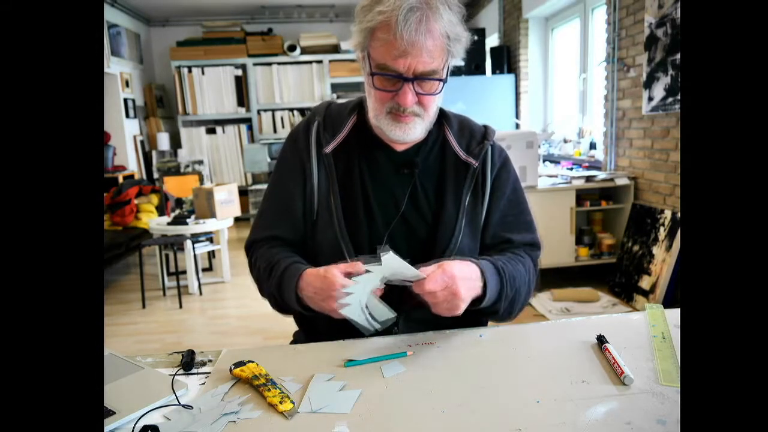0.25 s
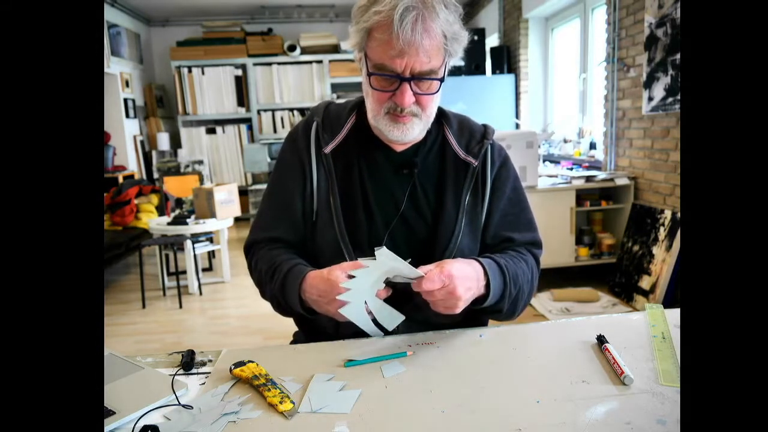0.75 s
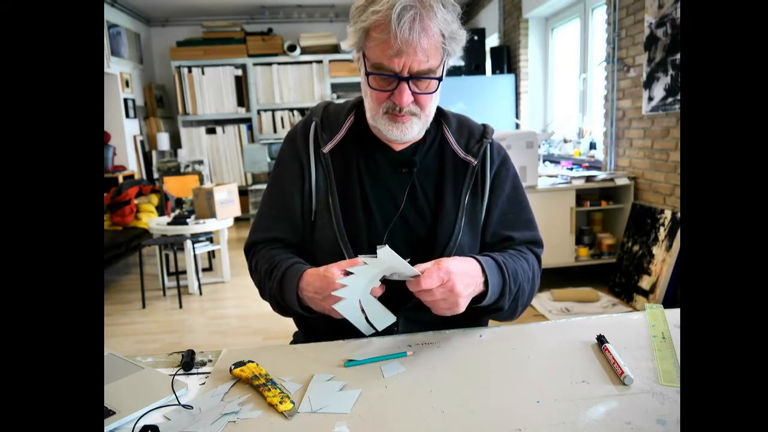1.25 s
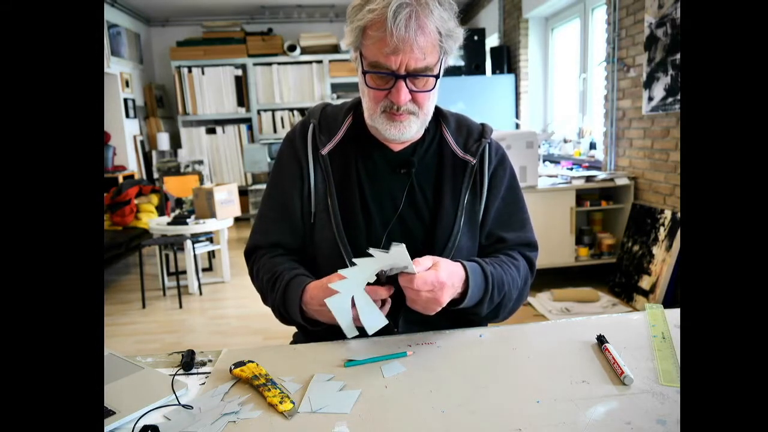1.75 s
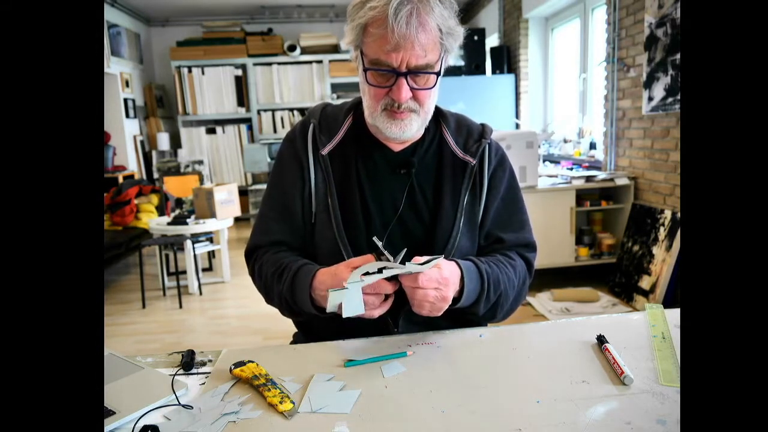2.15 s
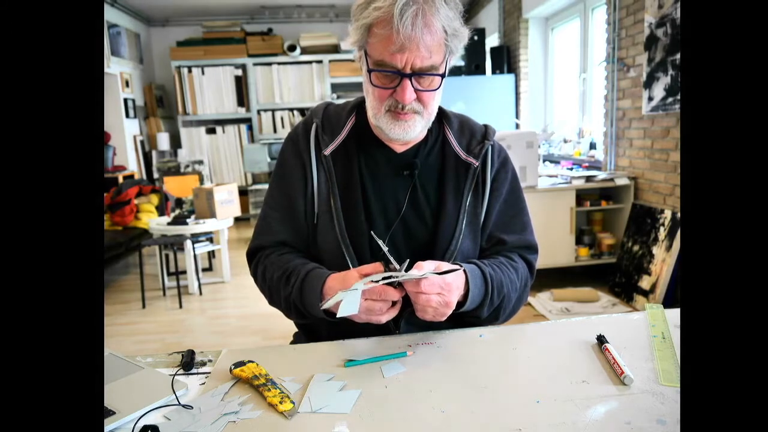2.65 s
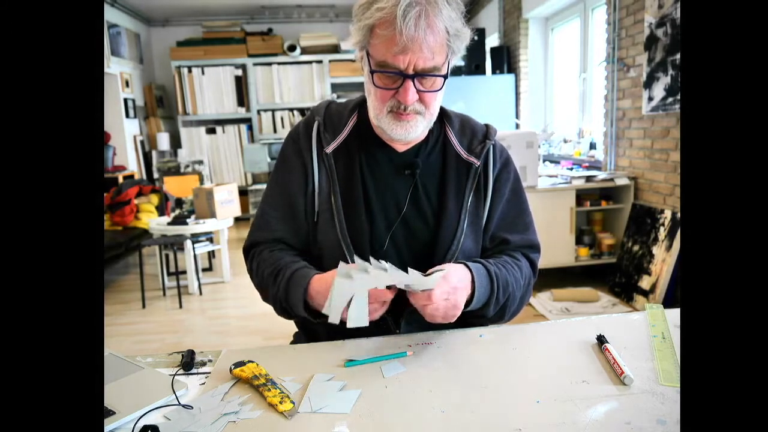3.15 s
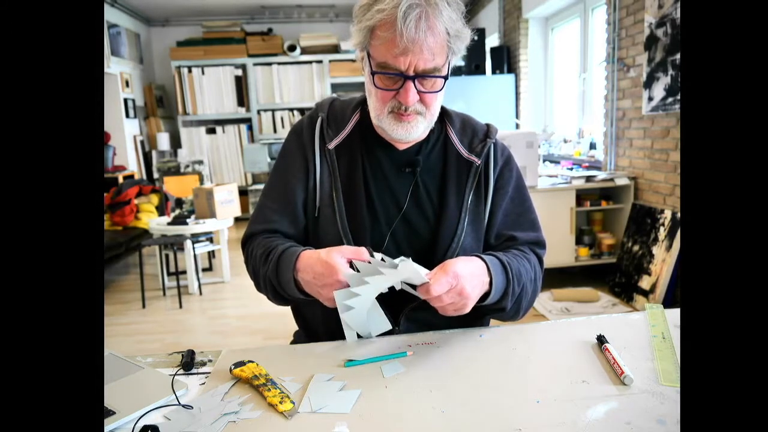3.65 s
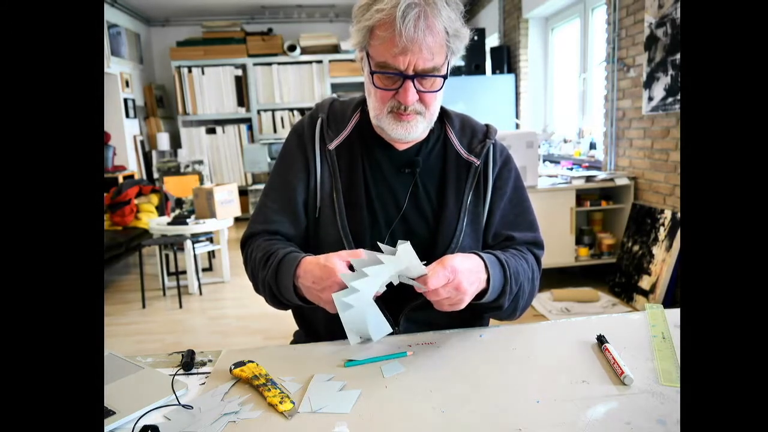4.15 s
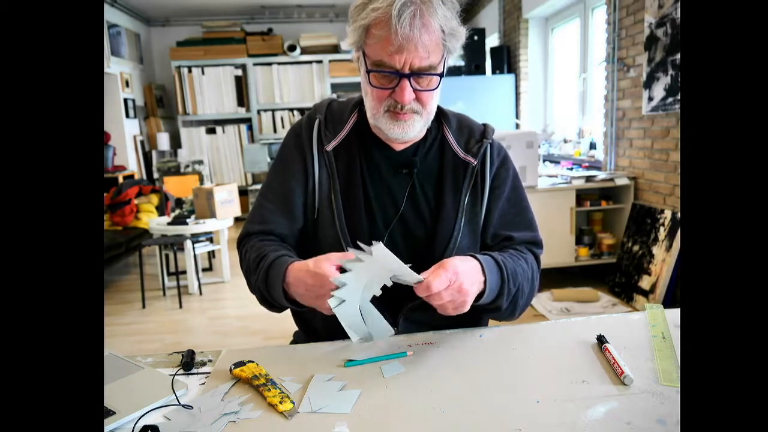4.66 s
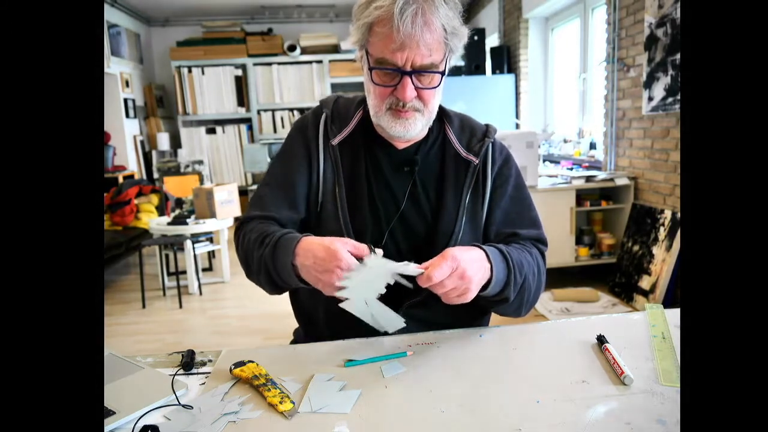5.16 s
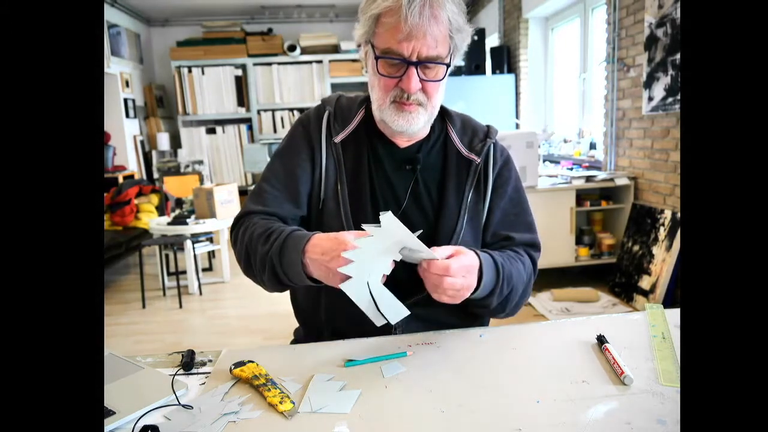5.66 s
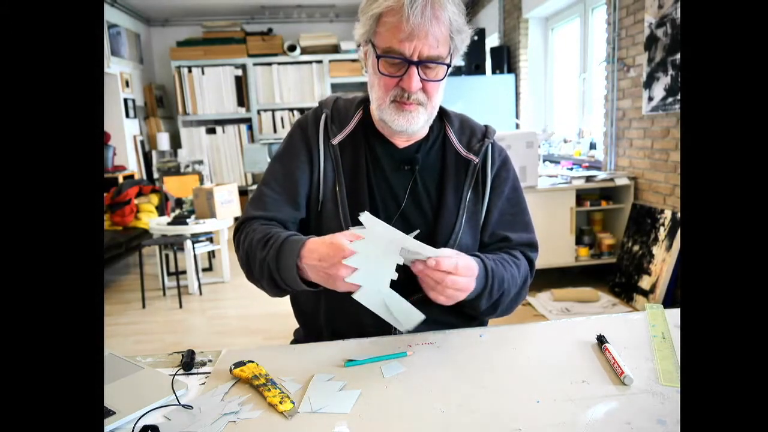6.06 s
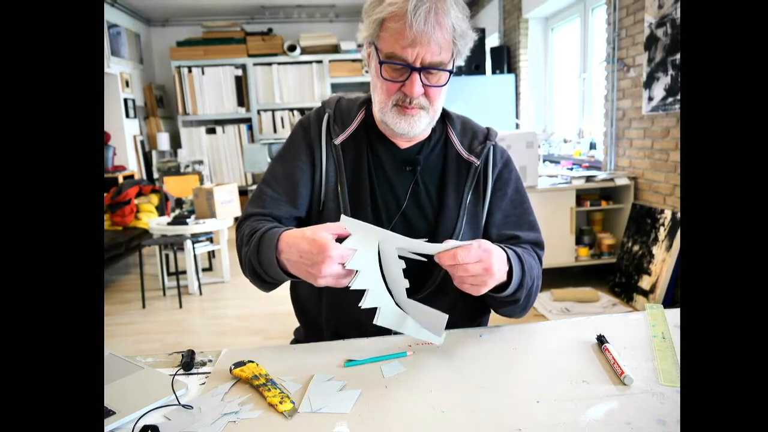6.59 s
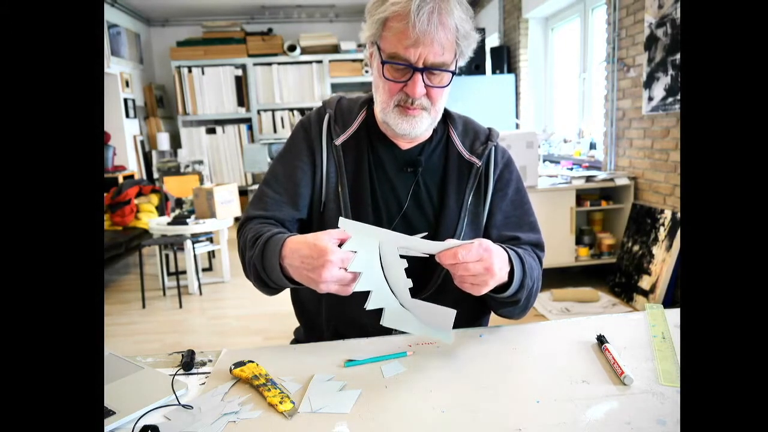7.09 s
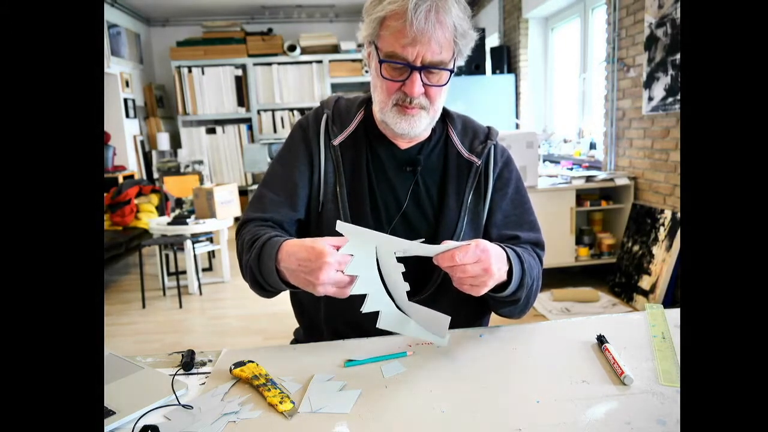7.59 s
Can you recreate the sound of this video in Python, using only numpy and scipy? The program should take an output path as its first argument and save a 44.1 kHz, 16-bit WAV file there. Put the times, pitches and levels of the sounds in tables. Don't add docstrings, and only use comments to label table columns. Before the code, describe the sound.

A close, dry view of scissors and stiff folded card in a quiet furnished room with faint hush. At 0.2 s a small cluster of papery pops, then a scraping bite at 0.6 and near quiet with tiny ticks. From 1.3 to 1.6 light snaps and a rub lead to a soft low slap; around 1.9-2.1 pressing, tearing crackles. Crunches run from 2.4 to 2.9, then a rising rub. At 3.2 the loudest moment: two or three hard, bright cracks with a heavy flap of the sheet. Rustles and a crunch follow at 3.4-3.7, dense small snaps at 4.0-4.4 with a sharper crack at 4.26, and a slap and crackle at 4.7-4.9. Rubs thin out after 5; a boxy pop comes at 5.55 and a firm snap at 5.96. Sparse scrapes and ticks continue, a barely audible steel touch at 7.0, then crisp snaps and a pressing scrape from 7.25 to 7.8.

```python
import sys
import numpy as np
from scipy import signal
from scipy.io import wavfile
from scipy.ndimage import uniform_filter1d

SR = 44100
rng = np.random.default_rng(int(sys.argv[2]) if len(sys.argv) > 2 else 0)


def master(y):
    cut = np.clip(np.atleast_2d(y).T, -1, 1)
    pcm = np.round(cut * 32767)
    wavfile.write(sys.argv[1], SR, pcm.astype(np.int16))


def decibels_to_gain(level_db):
    exponent = np.asarray(level_db, float) / 20
    return 10 ** exponent


N = 345303


def evened(x):
    return x / np.sqrt(np.mean(x ** 2) + 1e-20)


def topped(x):
    return x / np.sqrt(uniform_filter1d(x ** 2, size=44).max() + 1e-20)


def read(points, hz):
    f, value = np.transpose(points)
    return np.interp(np.log(hz + 1), np.log(f + 1), value)


def add(mix, s, sound):
    part = mix[round(s * SR):][:len(sound)]
    part += sound[:len(part)]


def colour(x, points):
    size = 2048
    gain_db = np.maximum(read(points, abs(np.fft.fftfreq(size, 1 / SR))), -70)
    log_gain = np.log(decibels_to_gain(gain_db))
    taps = np.fft.ifft(np.exp(np.conj(signal.hilbert(log_gain)))).real[:size // 2]
    return signal.oaconvolve(x, taps)[:len(x)]


def dulled(x, hz):
    return signal.sosfilt(signal.butter(3, min(hz, SR / 3), fs=SR, output="sos"), x)


def thinned(x):
    return signal.sosfilt(signal.butter(2, 130, "highpass", fs=SR, output="sos"), x)


def drift(per_s):
    return evened(signal.lfilter([1], [1, -np.exp(-2 * np.pi * per_s / SR)], rng.standard_normal(N)))


# frequency in Hz, density in dB per Hz.
HUSH = [(12, -41), (20, -35.5), (77, 5), (229, 6), (536, -2), (632, 5.5), (745, -7), (928, 6.5),
        (1360, -13.5), (2170, -5), (2860, -12.5), (4430, -13.5), (9000, -15.5), (12500, -30),
        (14500, -39.5), (16000, -69.5)]


def hush():
    level_db = -76 + 1.2 * drift(0.14)
    return decibels_to_gain(level_db) * evened(colour(rng.standard_normal(N), HUSH))


# frequency in Hz, t60 in seconds.
ROOM = [(200, 0.054), (1000, 0.28), (4000, 0.17), (12000, 0.028)]


def room(x):
    taps = np.zeros(SR // 2)
    at = np.arange(300, len(taps) - 20, 20)
    taps[at + rng.integers(0, 20, len(at))] = rng.choice([-1., 1.], len(at))
    hz, t, z = signal.stft(taps, SR, nperseg=256)
    t60 = np.maximum(read(ROOM, hz), .02)[:, None]
    tail = signal.istft(z * decibels_to_gain(-60 * t / t60), SR, nperseg=256)[1]
    return signal.oaconvolve(x, tail / np.linalg.norm(tail))[:N]


# start in seconds, peak in dB, frequency in Hz.
SLAPS = [(0.167, -56, 75), (0.162, -50, 229), (1.618, -36, 185), (1.923, -49.5, 128), (3.229, -26.5, 207.7),
         (3.692, -35, 221), (4.255, -52, 196), (4.739, -32, 221.7), (5.553, -40, 251), (5.334, -46.5, 151),
         (5.904, -55, 149), (7.328, -47, 259), (7.72, -70, 200), (7.771, -46, 180)]


def slaps():
    out, t = np.zeros(N), np.arange(5000) / SR
    for s, db, hz in SLAPS:
        push = np.sin(2 * np.pi * hz * t) * np.exp(-t * hz)
        add(out, s, decibels_to_gain(db) * push * np.minimum(t / 0.0039, 1))
    return out


# start in seconds, level in dB, frequency in Hz, t60 in seconds.
BLADE = [
    (7.027, -82.5, 8000, 0.37),
    (7.104, -84, 8070, .3),
]


def blades():
    out, t = np.zeros(N), np.arange(SR // 4) / SR
    for s, db, hz, t60 in BLADE:
        add(out, s, decibels_to_gain(db - 60 * t / t60) * np.sin(2 * np.pi * hz * t))
    return out


# start in seconds, length in seconds, level in dB, frequency in Hz, glide in Hz.
RASPS = [(1.005, .012, -64, 7300, 0), (1.47, .06, -60, 1900, 0), (1.7, .09, -54, 1800, 0),
         (1.9, .07, -51, 1700, 0), (1.95, .05, -51, 4000, 0), (2.29, .045, -65, 4400, 0),
         (2.39, .08, -51, 1000, 0), (3.155, .012, -48, 4500, 200), (3.205, .045, -37, 1900, 0),
         (3.23, .03, -36, 420, 0), (3.857, .012, -56, 4700, 0), (3.857, .012, -60, 1800, 0),
         (3.892, .008, -52, 4500, 0), (4.005, .04, -64, 4700, 0), (4.17, .11, -54, 420, 0),
         (4.465, .01, -70, 7000, 0), (4.62, .045, -61, 3700, 0), (4.64, .05, -56, 1400, 0),
         (4.7, .045, -52, 4600, 400), (4.92, .08, -53, 4600, 300), (4.93, .07, -61, 7850, 0),
         (5.12, .05, -74, 8100, 200), (5.215, .115, -57, 4810, -150), (5.23, .1, -67, 7900, -200),
         (5.24, .09, -64, 3900, 0), (5.553, .01, -40, 380, 0), (5.57, .04, -57, 4300, 0),
         (5.94, .02, -58, 4200, 0), (5.94, .02, -56, 1100, 0), (5.961, .003, -37, 2570, 0),
         (5.97, .1, -52, 450, 0), (6.12, .07, -61, 2000, 100), (7.026, .004, -57, 4900, 0),
         (7.026, .004, -55, 7300, 0), (7.125, .03, -57, 1500, 0), (7.15, .05, -77, 7600, -100)]
DRAGS = [(.16, 0.0065, -58, 14300, 0), (.612, 0.045, -66, 14500, -500), (1.618, 0.0069, -36.5, 2150, -3),
         (4.695, .06, -62, 14800, 0), (5.552, 0.0086, -41, 1106, 0), (7.102, .01, -63, 13800, 0),
         (6.8, 0.037, -61, 2300, 4.5), (.159, 0.0084, -35, 1622, 0), (1.47, .06, -76, 7300, 0),
         (2.38, .09, -69, 7000, 0), (2.383, .085, -52, 4400, -9), (2.545, .02, -63.5, 14000, 0),
         (3.2273, .003, -18, 2200, -0.5), (3.425, .06, -65, 7800, 500), (3.429, .03, -49, 4300, 0),
         (3.55, .08, -56, 7200, 395), (3.56, .11, -54, 11300, 298), (4.275, .04, -57, 4400, -300),
         (4.336, .08, -56.5, 3800, -11), (4.334, .08, -63.5, 7200, -6), (4.335, .09, -64.5, 14300, 0),
         (4.409, .03, -55.5, 2600, 0), (4.463, .07, -61, 3800, -6), (4.7, .045, -43.5, 4800, 311),
         (4.702, .04, -49, 8300, -1.5), (4.918, .085, -59, 4500, 492), (5.565, .045, -65, 14300, 0),
         (5.989, .04, -56, 7300, 0), (6.27, .07, -74, 14300, 2), (7.026, .004, -58, 2100, -2),
         (7.025, .004, -53, 9800, 0), (7.72, .07, -66, 14300, 0)]
RASP_WIDTH_HZ, DRAG_WIDTH_HZ = 320, 1300
RASP_EDGE_S, CHATTER_DB = 0.0055, 3


def rasps():
    out, t = np.zeros(N), np.arange(SR // 4) / SR
    rows = [(*row, RASP_WIDTH_HZ) for row in RASPS] + [(*row, DRAG_WIDTH_HZ) for row in DRAGS]
    chance = rng.standard_normal((len(rows), 3, len(t)))
    for (s, length, db, hz, glide_hz, width_hz), (a, b, c) in zip(rows, chance):
        r = np.exp(-np.pi * width_hz / SR)
        chatter = decibels_to_gain(CHATTER_DB * evened(uniform_filter1d(c, size=90)))
        band = signal.lfilter([1], [1, -2 * r, r * r], (a + 1j * b) * chatter)
        pitch_hz = hz + glide_hz * np.minimum(t / length, 1)
        turn = np.exp(2j * np.pi * np.cumsum(pitch_hz) / SR)
        edge = min(RASP_EDGE_S, length / 2)
        shape = np.minimum(t / edge, 1) * np.exp(-np.maximum(t - length, 0) / edge)
        add(out, s - edge / 2, decibels_to_gain(db) * shape * evened((band * turn).real))
    return out


def fibre_burst(noise, length, t):
    u = t / np.clip(length - .0012, .0006, .03)
    rise = np.minimum(t / (0.0021 + 75 * length ** 2), 1)
    decay = np.exp(-1.2 * u - 1.9 * u ** 2) + 0.082 * np.exp(-.5 * u)
    burst = noise * rise * decay
    facing = int(10 + 3 * abs(noise[-1]) + 6 * abs(noise[-2]))
    return burst - 1.8 * np.roll(burst, facing)


# frequency in Hz, density in dB per Hz.
BOOM = [(250, -34.5), (430, 4.5), (800, 6.5), (1300, 3), (1700, 1), (2100, 0.5), (2600, -6.5), (3300, -8.5),
        (5000, -34.5), (11500, -42.5), (14500, -66)]
SCRAPE = [(1530, -5.5), (2600, -4.5), (2970, -2), (4010, 3), (4350, 0), (4720, 2), (5310, -4.5),
          (5940, -13.5), (6580, -8), (7210, -7), (8800, -20), (11400, -64), (19400, -120)]
FIZZ = [(3000, -41.5), (6000, -21.5), (8400, -8), (9000, -7), (10400, 1), (11300, -4.5), (12400, -14),
        (13200, -22), (15500, -59.5)]
AIR = [(11000, -31), (12500, -5.5), (13800, 3), (14600, -4.5), (15400, -21), (16300, -41.5)]


def panel_ring(burst, hz, t):
    modes = np.cos(2 * np.pi * hz * t) + 0.22 * np.cos(2 * np.pi * 2.103 * hz * t)
    ring = np.exp(-t * (hz / 6.2 + 200)) * modes
    panel = topped(dulled(signal.fftconvolve(burst, ring)[:len(t)], 2.13 * hz))
    return topped(panel + 0.35 * topped(dulled(colour(burst, BOOM), 2.18 * hz)))


# start in seconds, crack level in dB, panel pitch in Hz,
# panel level in dB above the crack, fizz level in dB above the crack.
BREAKS = [(0.1999, -53.5, 840, 19.5, -8), (0.3107, -84, 866, 38, -12), (0.6281, -46, 725, 18, 11),
          (1.321, -56, 766, -5, 8.5), (1.348, -53.5, 1420, 4.5, -2), (1.3904, -72.5, 593, 26, 1),
          (1.572, -62, 1370, 21.5, -2), (1.585, -41.5, 860, -1, -10), (1.5958, -53.5, 1040, 16, 3),
          (2.0724, -49.5, 895, 3.5, -20), (2.4358, -54.5, 1020, 16.5, -7),
          (3.1848, -14.5, 1620, -37, -17.5), (3.207, -36.5, 1700, 11.5, -15),
          (3.2271, -13.5, 1370, -1.5, -18), (4.2161, -42, 727, 14, -1), (4.2565, -27, 980, -4.5, -9.5),
          (5.3572, -48.5, 914, 10.5, -33), (5.905, -46.5, 360, 7, -31.5), (5.961, -30, 1150, 12.5, -40),
          (6.264, -54.5, 1200, 16, -8), (7.0262, -64, 2030, 21, 1), (7.5063, -70, 606, -6.5, 11),
          (7.6728, -44, 1104, 11.5, 12.5)]
SNAPS_OF_FOLD = [(0.1865, -55.5, 890, 20, -10), (0.2085, -46, 920, 13, -10), (0.2148, -43.5, 880, 10, -12),
                 (1.3742, -73.5, 410, 19, 25), (1.6172, -35.5, 970, 4, -1.5),
                 (3.0587, -52, 785, 14.5, -16.5), (3.0696, -53, 805, 12, -5), (3.156, -36.5, 1380, -1, -14),
                 (3.193, -35.5, 616, 8, -19), (3.212, -35, 1150, 7.5, -17), (3.4525, -60, 605, 2, -14),
                 (3.892, -57, 730, 1, -26), (4.1723, -39.5, 744, 9.5, -24.5), (4.2291, -39.5, 740, 1, -5),
                 (4.2669, -37.5, 696, 5.5, -10), (4.483, -46.5, 473, -3, -11), (4.74, -35.5, 695, 6.5, 4),
                 (4.7659, -36, 1790, 7, -11), (4.8327, -42.5, 900, 10.5, -14),
                 (4.8884, -56.5, 696, 14.5, 20), (5.5518, -52, 605, 27, -16.5),
                 (5.8776, -47.5, 362, -31.5, -12.5), (7.2542, -44, 1840, -0.5, 0.5),
                 (7.6197, -39, 1320, -5, 5)]
TEARS = [(0.1585, -32.5, 965, 8.5, -6), (0.323, -81.5, 975, 28, -12), (1.0932, -47, 840, 12, -9),
         (1.9243, -46.5, 335, 3, -22), (1.9623, -36.5, 1360, -8, -23), (2.0072, -68.5, 925, 27.5, -3),
         (2.0466, -44, 2070, 5, -1), (2.5046, -54.5, 1000, -2, 1), (2.5956, -46, 930, 5, -12),
         (2.62, -40, 940, -6, -4), (2.6569, -41.5, 980, 2.5, -5), (3.2369, -42, 1190, 20.5, -16),
         (3.4663, -64, 860, 13, -10), (3.6905, -34.5, 910, 4, -19), (4.0756, -40.5, 1350, 3.5, -9),
         (4.1471, -42, 855, 6, -25), (4.3627, -43.5, 1230, -5, -17), (5.3308, -60, 1380, 22, -42),
         (6.4837, -58.5, 2063, 13, 0), (7.1022, -41, 1560, 0, 0.5), (7.3282, -43.5, 520, 3, 0.5),
         (7.3733, -57.5, 560, -15, 6), (7.587, -46, 1860, 4.5, -22), (7.719, -50, 540, 8, 4),
         (4.1375, -44.5, 1270, 6, -5)]
CRUNCHES = [(1.9405, -47, 1510, 7.5, -15), (1.9891, -34.5, 1460, -3.5, -15), (2.4485, -51, 1000, 14, -4),
            (2.5381, -35.5, 744, -1, -1.5), (2.5695, -39, 716, 3, -2.5), (2.8485, -39.5, 540, -0.5, -12),
            (3.6392, -38.5, 1470, 4.5, -30), (4.0462, -43, 1330, 3, -6), (4.1008, -39.5, 1150, 3.5, -8),
            (4.123, -52.5, 900, 9, -5), (5.6894, -55.5, 950, 13.5, 5), (6.2488, -65.5, 1820, 22, -22),
            (6.791, -55, 1810, 7, -3), (4.18, -50.5, 780, 3, -27), (3.66, -55.5, 530, 18, -11),
            (3.25, -53.5, 400, 8, -11.5)]
# start in seconds, crack level in dB, fizz level in dB above it.
TICKS = [(1.0051, -62.5, -5), (1.2, -57, 5.5), (2.215, -64, -31), (2.299, -56.5, -3), (2.8191, -48.5, 2),
         (3.83, -51, -45), (3.859, -55, 0), (3.912, -66, -11), (2.689, -58, 5), (4.548, -57.5, 2),
         (4.6, -61, 2), (4.844, -57, 7), (4.875, -71, -2), (4.009, -53.5, 4.5), (5.84, -56, -1),
         (7.158, -67, 7), (7.273, -45.5, -6), (7.422, -62.5, -4), (0.315, -69.5, -3), (.332, -75, -2),
         (1.154, -60, -10), (1.298, -65, -4), (2.317, -57, 2.5), (3.419, -54.5, 4), (3.668, -47, -4),
         (4.756, -46, 4), (4.882, -63, -12), (5.813, -66.5, -2), (6.455, -64, -3), (7.203, -77, -9),
         (.822, -71, 6.5), (.913, -72, 0), (6.581, -68, -10.5), (6.65, -67, -5), (6.703, -75, -2),
         (6.757, -65, -7)]
BREAK_S, SNAP_S, TEAR_S, CRUNCH_S, TICK_S = 0.0022, 0.0045, 0.0064, 0.0087, 0.0065
TICK_HZ, TICK_PANEL_DB = 970, -10.5


def snaps():
    out, t = np.zeros(N), np.arange(2600) / SR
    kinds = zip((BREAKS, SNAPS_OF_FOLD, TEARS, CRUNCHES), (BREAK_S, SNAP_S, TEAR_S, CRUNCH_S))
    rows = [(*row, length) for table, length in kinds for row in table]
    rows += [(s, db, TICK_HZ, TICK_PANEL_DB, fizz_db, TICK_S) for s, db, fizz_db in TICKS]
    chance = rng.standard_normal((len(rows), len(t)))
    for (s, db, hz, panel_db, fizz_db, length), noise in zip(rows, chance):
        burst = fibre_burst(noise, length, t)
        crack = topped(colour(burst, SCRAPE))
        fizz = decibels_to_gain(fizz_db) * topped(colour(burst, FIZZ))
        air = decibels_to_gain(-22) * topped(colour(burst, AIR))
        panel = decibels_to_gain(panel_db) * panel_ring(burst, hz, t)
        add(out, s + .0004, decibels_to_gain(db) * (crack + fizz + air + panel))
    return out


def strokes(rows, attack, change_db, release):
    power, t = np.zeros((3, N)), np.arange(SR // 2) / SR
    onset = np.minimum(t / attack, 1) ** 2
    for s, length, db, boom_db, fizz_db in rows:
        slope_db = change_db * np.minimum(t / length, 1) - max(change_db, 0)
        shape_db = slope_db - release * np.maximum(t - length, 0)
        shape = (onset * decibels_to_gain(db + shape_db)) ** 2
        for layer, above_db in zip(power, (0, boom_db, fizz_db)):
            add(layer, s - attack / 2, shape * decibels_to_gain(2 * above_db))
    return power


def patchy(x, patch_db, shift_db):
    z = signal.stft(x, nperseg=256)[2]
    fine, wide = rng.standard_normal((2, z.shape[1], z.shape[0]))
    fine = evened(uniform_filter1d(uniform_filter1d(fine, size=40, axis=0), size=2, axis=1))
    wide = evened(uniform_filter1d(uniform_filter1d(wide, size=14, axis=0), size=7, axis=1))
    gain_db = np.clip(patch_db * fine + shift_db * wide, -10, 7)
    return signal.istft(z * decibels_to_gain(gain_db).T, nperseg=256)[1][:N]


def slips():
    size = decibels_to_gain(2.8 * np.minimum(rng.exponential(1, N), 3))
    grains = size * (rng.random(N) < 3000 / SR)
    drive = 1.2 * rng.standard_normal(N) + evened(grains * rng.standard_normal(N))
    clumping = decibels_to_gain(1.5 * np.clip(drift(22), -2, 2))
    return patchy(drive * clumping, patch_db=3.5, shift_db=2.3)


# frequency in Hz, density in dB per Hz.
HOLLOW = [(60, -29.5), (150, -8.5), (300, -1.5), (360, 4), (480, -16.5), (800, -41.5), (11500, -35),
          (14500, -69)]
# start in seconds, length in seconds,
# scrape level in dB, panel boom in dB above it, fibre fizz in dB above it.
BITES = [(.604, 0.11, -42, 6.5, -0.5), (1.318, 0.11, -64, 7.5, 0), (1.615, 0.18, -51, 10.5, 3.5),
         (2.045, 0.037, -44, 4, -12), (2.54, 0.17, -68, 8, 10), (2.54, 0.79, -74, 19.5, -8),
         (2.85, 0.031, -59, 24.5, 15.5), (3.187, 0.18, -36, 9.5, -9), (4.69, 0.05, -54, 10, 7),
         (4.747, 0.3, -58, 18.5, -24), (5.56, 0.075, -49.5, -18, 2.5), (5.965, 0.25, -47.5, 6, 1.5),
         (6.79, 0.058, -54.5, -19, -1), (7.03, 0.043, -82, 20, 3.5), (7.103, 0.06, -55.5, 10, 0),
         (7.255, 0.055, -56, 9.5, -2), (7.33, 0.058, -70, 16, 6)]
RUBS = [(.165, 0.075, -61, 15.5, -3), (.8, 0.07, -78, 13, -10), (1.47, 0.069, -49.5, -34, -3.5),
        (1.56, 0.1, -59.5, 5, -0.5), (1.64, 0.29, -72, 1, 18), (2.2, 0.017, -50, 0, -11),
        (2.3, 0.043, -59, 6, -10), (2.375, 0.11, -51, 7, -6.5), (2.97, 0.14, -41.5, 5, -7.5),
        (3.09, 0.17, -52.5, 9, -5.5), (3.55, .15, -43, -0.5, -6), (3.83, 0.095, -65.5, 1, -8),
        (3.91, 0.32, -72, 10, 8), (4.045, 0.18, -59.5, 14.5, 5.5), (4.345, 0.065, -58.5, -5, 11.5),
        (4.47, 0.14, -61.5, 7, -18), (4.6, 0.086, -57.5, 3.5, -2), (5.04, .15, -65.5, 14.5, -10),
        (5.21, 0.13, -59.5, 11.5, -3), (5.41, 0.13, -58.5, 0.5, 8.5), (5.85, 0.17, -61, 5, 2.5),
        (6.23, 0.13, -52.5, 5.5, 1.5), (6.38, 0.068, -60.5, 0, -6), (6.47, 0.031, -51.5, 7, -1.5),
        (7.59, 0.13, -58, 5, 0)]
SWELLS = [
    (1.15, 0.063, -58.5, -7, -0.5),
    (1.9, 0.093, -47, -3, -0.5),
    (3.4, 0.075, -47.5, 2.5, -9),
    (4.69, 0.074, -47.5, -4, 1.5),
    (4.86, 0.13, -46.5, 4, -2.5),
    (5.65, 0.089, -48.5, 2, 1),
    (7.7, 0.078, -42.5, 0.5, 1.5),
    (7.79, 0.05, -56, 10, 2),
]
# attack in seconds, change over the length in dB, release in dB per second.
BITE = (0.012, -13.5, 650)
RUB = (0.051, -0.11, 446)
SWELL = (0.014, 16, 480)
# time in seconds, level in dB.
GRIP = [(0.0, -106), (0.52, -71), (0.67, -65.5), (1.59, -77), (1.79, -58.5), (2.2, -71.5), (3.23, -55),
        (3.47, -64.5), (5.26, -63), (5.78, -74.5), (6.13, -65), (6.67, -74.5), (6.96, -74.5), (7.18, -67.5),
        (7.61, -74.5), (7.83, -64)]
HOLLOW_UNDER_BOOM_DB, BOOM_OF_GRIP_DB = -22, -0.5
SCRAPE_OF_GRIP_DB, FIZZ_OF_GRIP_DB = -11, -22.5
AIR_OF_SCRAPE_DB, AIR_FULL_DB = -19, -51


def slide():
    scrape, boom, fizz = strokes(BITES, *BITE) + strokes(RUBS, *RUB) + strokes(SWELLS, *SWELL)
    firm = np.sqrt(scrape * fizz)
    tearing = np.minimum(firm / decibels_to_gain(2 * AIR_FULL_DB), 1) ** .3
    air = firm * decibels_to_gain(2 * AIR_OF_SCRAPE_DB) * tearing
    grip = decibels_to_gain(2 * np.interp(np.arange(N) / SR, *np.transpose(GRIP)))
    hollow = grip + boom * decibels_to_gain(2 * HOLLOW_UNDER_BOOM_DB)
    boom = boom * decibels_to_gain(2 * -3.7) + grip * decibels_to_gain(2 * BOOM_OF_GRIP_DB)
    scrape = scrape + grip * decibels_to_gain(2 * SCRAPE_OF_GRIP_DB)
    fizz = fizz + grip * decibels_to_gain(2 * FIZZ_OF_GRIP_DB)
    drive = slips()
    layers = zip((hollow, boom, scrape, fizz, air), (HOLLOW, BOOM, SCRAPE, FIZZ, AIR))
    return sum(np.sqrt(power) * evened(colour(drive, points)) for power, points in layers)


# frequency in Hz, gain in dB.
CHEST = [(5500, -0.5), (6100, 0), (6700, -1.5), (7900, -1.5), (8600, -3.5), (9300, -0.5)]


def scene():
    sharp = thinned(snaps()) + slaps()
    echo = decibels_to_gain(-20.5) * room(sharp)
    near = colour(sharp + thinned(slide()), CHEST)
    return (near + echo + thinned(rasps() + blades()) + hush())[None]


def low_pass(x):
    return signal.sosfilt(signal.butter(12, 16450, fs=SR, output="sos"), x)


def record(dry):
    hz, t, z = signal.stft(dry[0], SR, nperseg=1024)
    power = uniform_filter1d(uniform_filter1d(abs(z) ** 2, size=25, axis=0), size=3, axis=1)
    level_db = 10 * np.log10(power + 1e-20)
    mask_db = np.maximum(level_db[(hz > 7000) & (hz < 12000)].max(0) - 21, -118)
    masked = (level_db < mask_db) & (hz > 12300)[:, None]
    weak = np.logical_or.accumulate(masked, axis=0)
    dropped = weak | (hz > 16400)[:, None]
    kept = signal.istft(z * ~dropped, SR, nperseg=1024)[1][:N]
    return low_pass(kept[None])


dry = scene()
out = record(dry)
master(out)
```